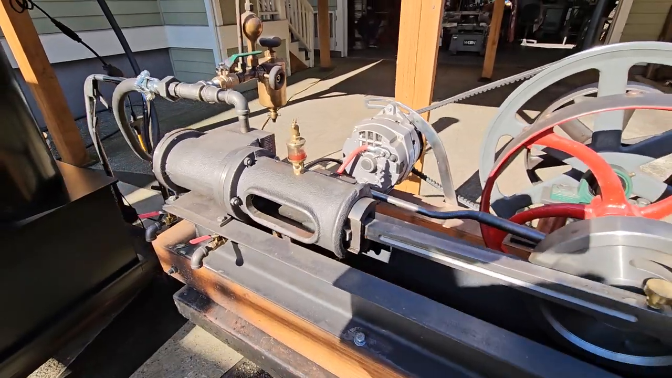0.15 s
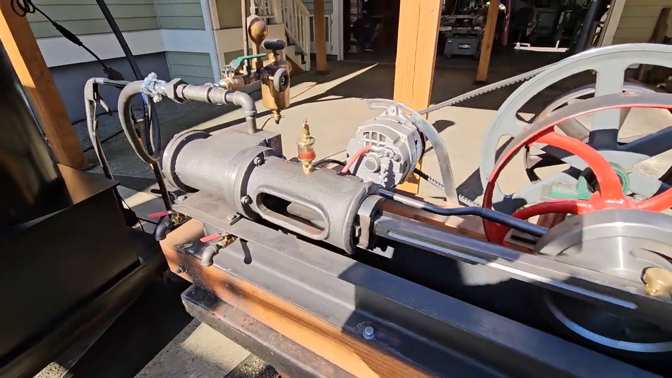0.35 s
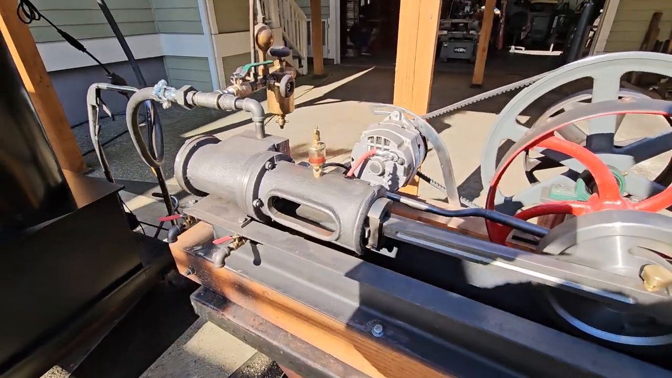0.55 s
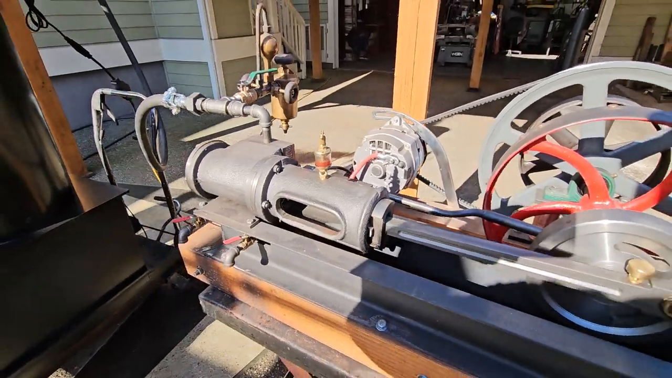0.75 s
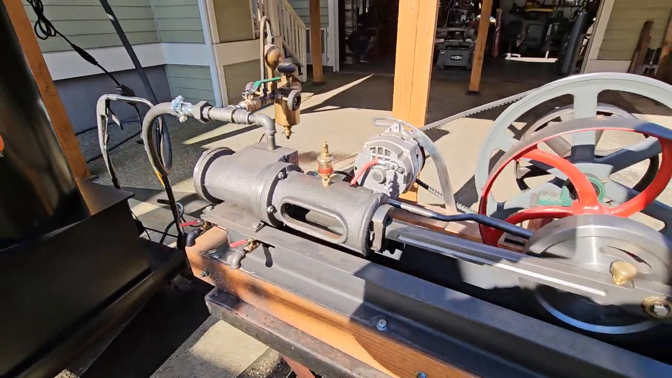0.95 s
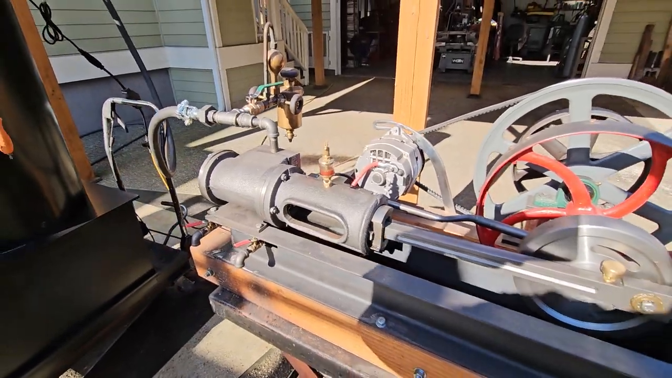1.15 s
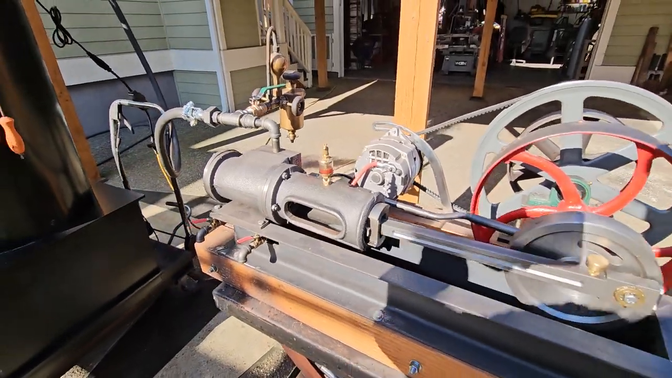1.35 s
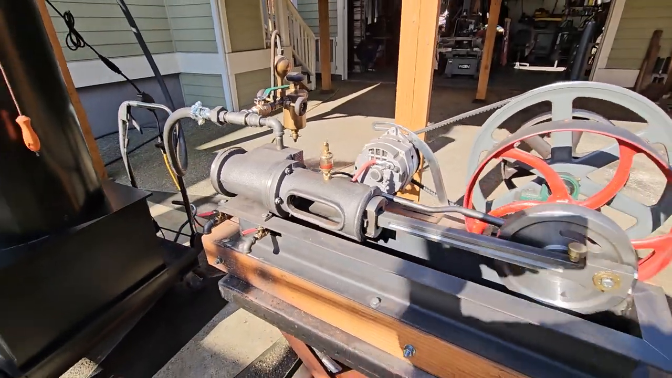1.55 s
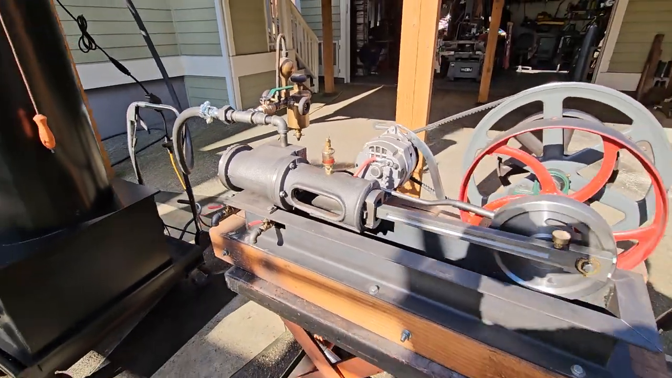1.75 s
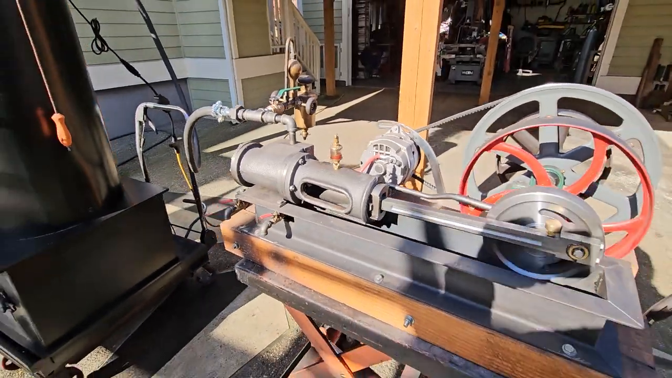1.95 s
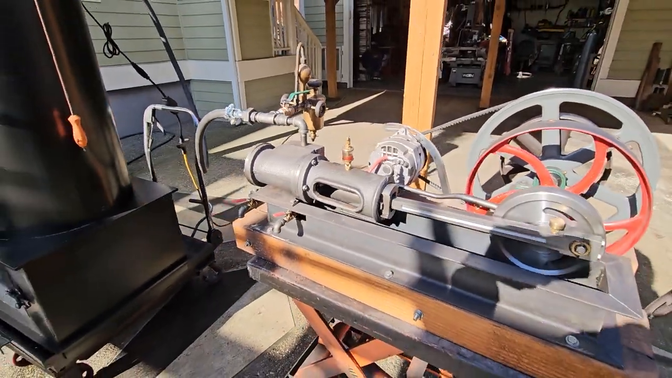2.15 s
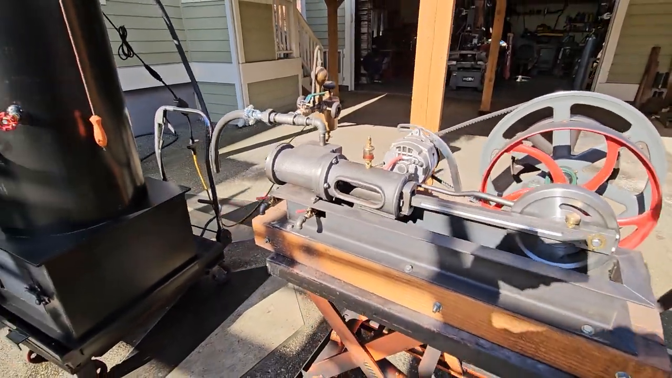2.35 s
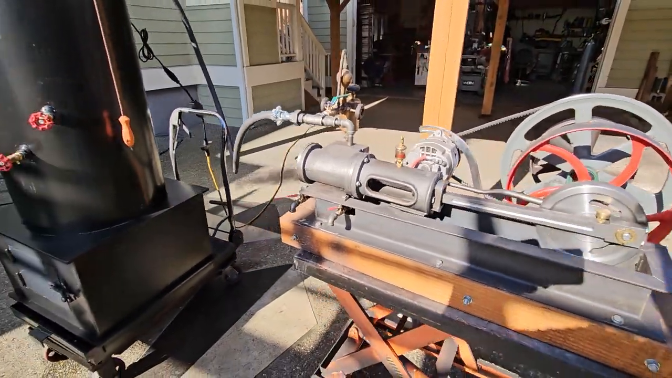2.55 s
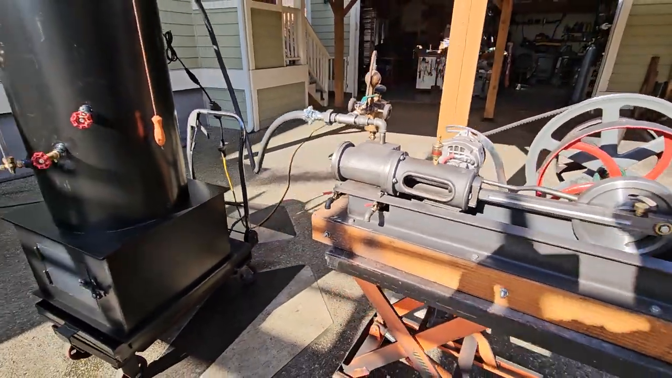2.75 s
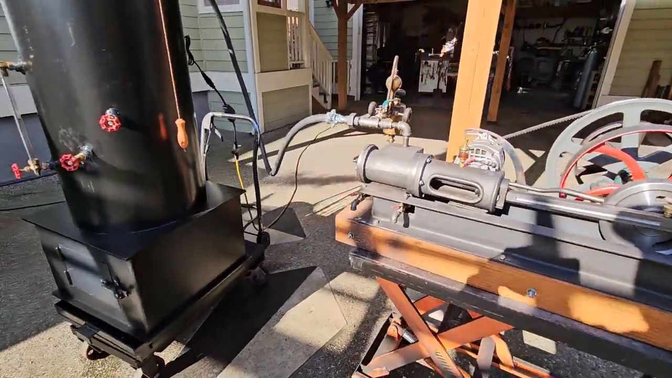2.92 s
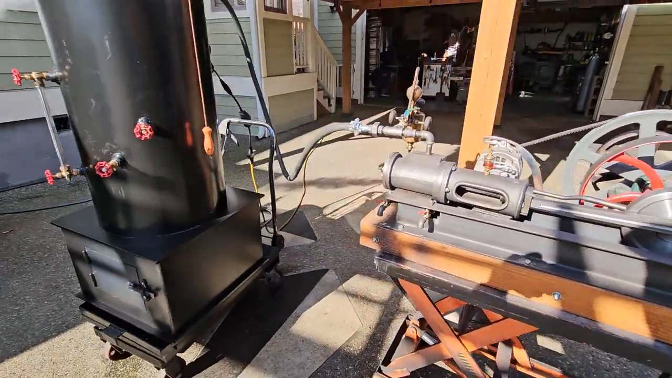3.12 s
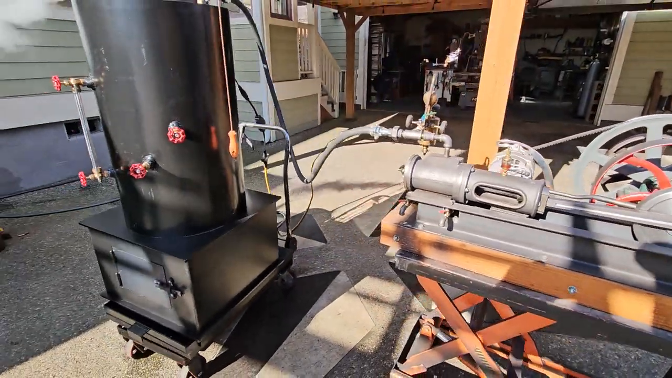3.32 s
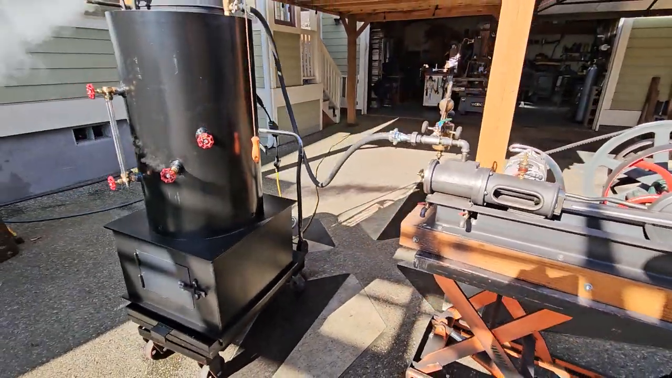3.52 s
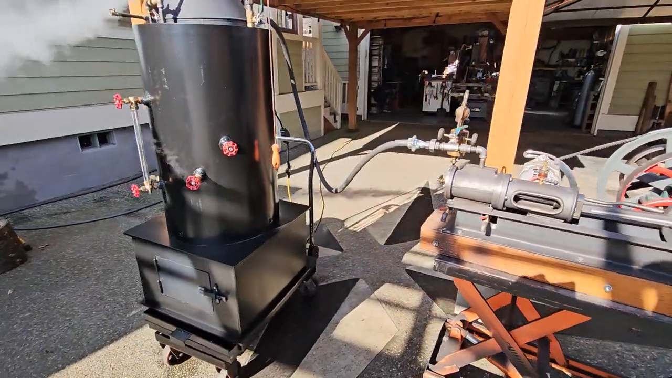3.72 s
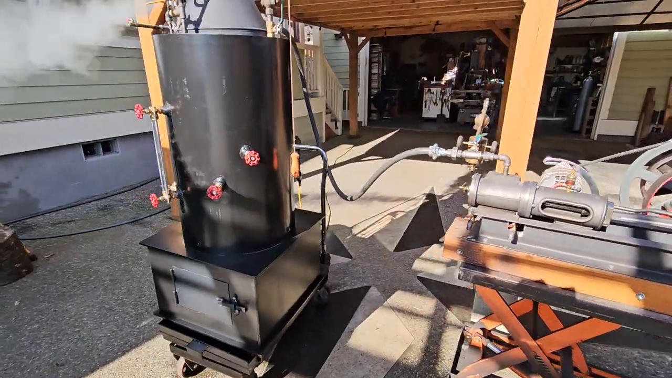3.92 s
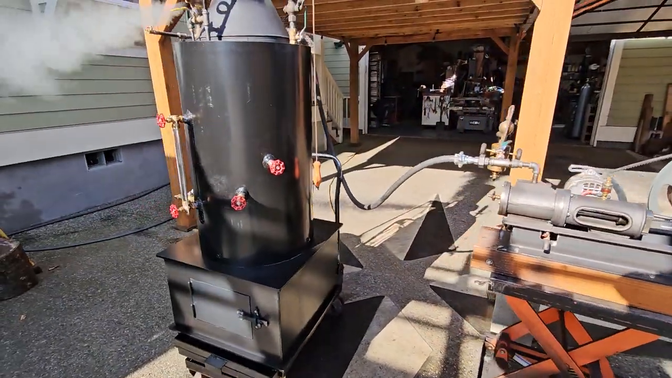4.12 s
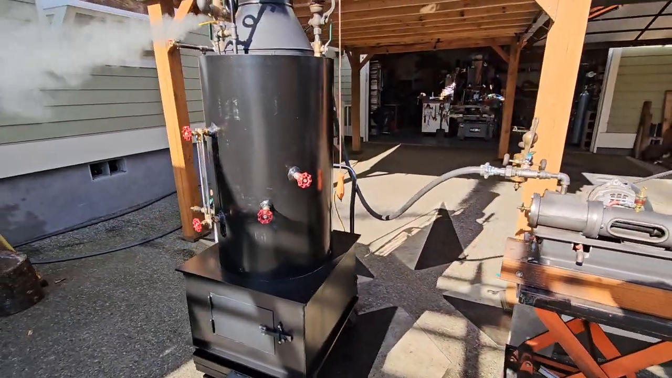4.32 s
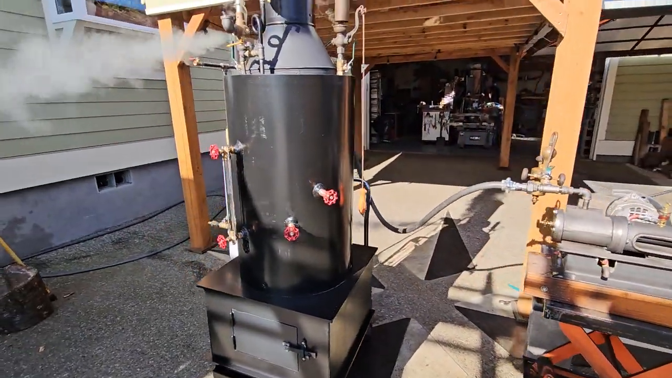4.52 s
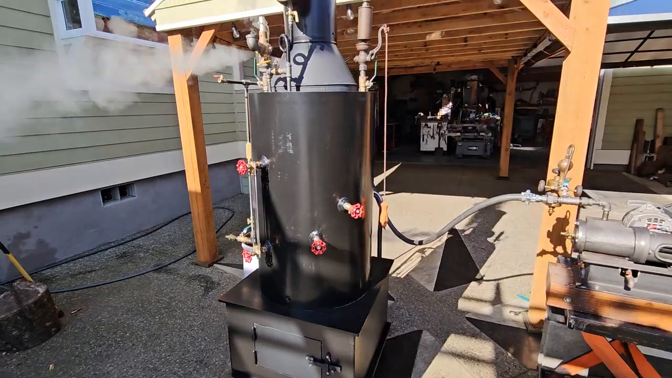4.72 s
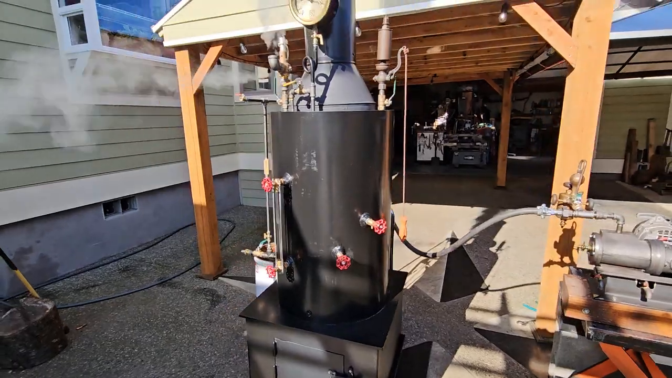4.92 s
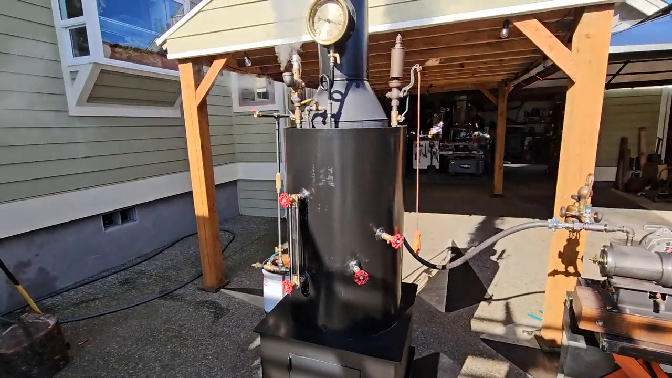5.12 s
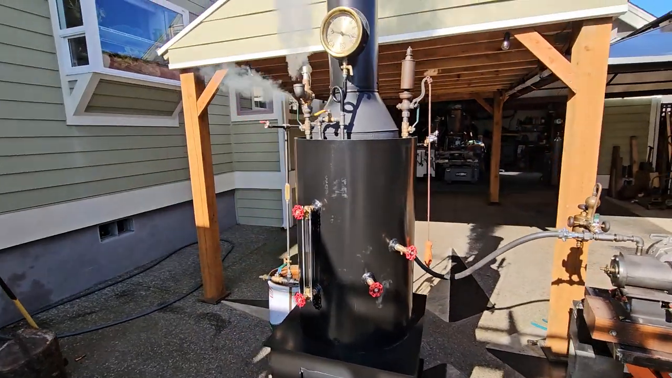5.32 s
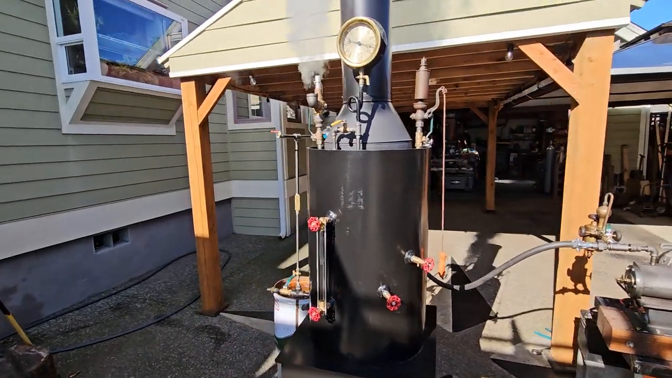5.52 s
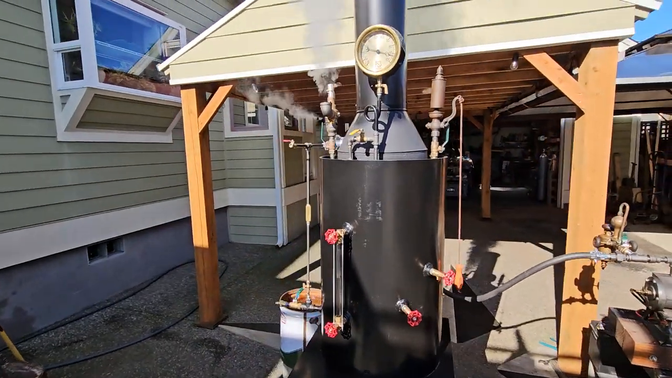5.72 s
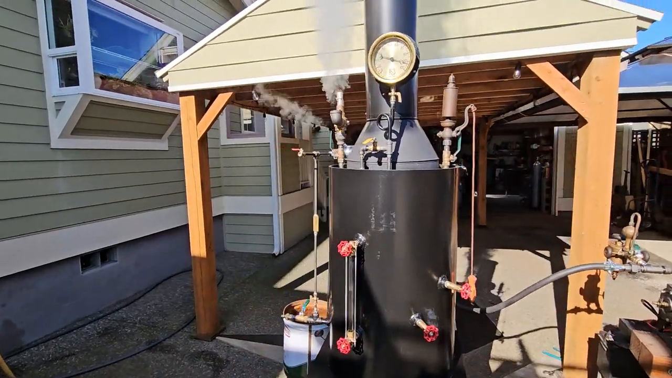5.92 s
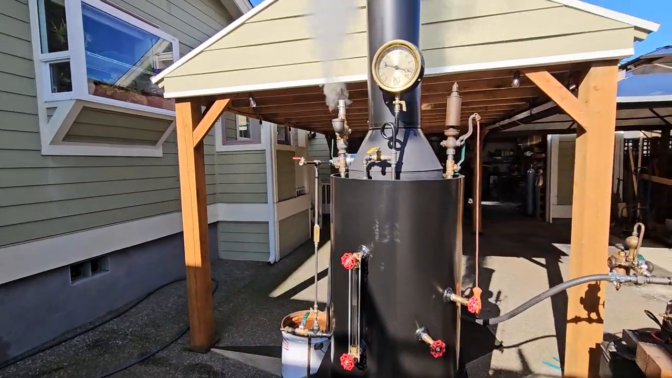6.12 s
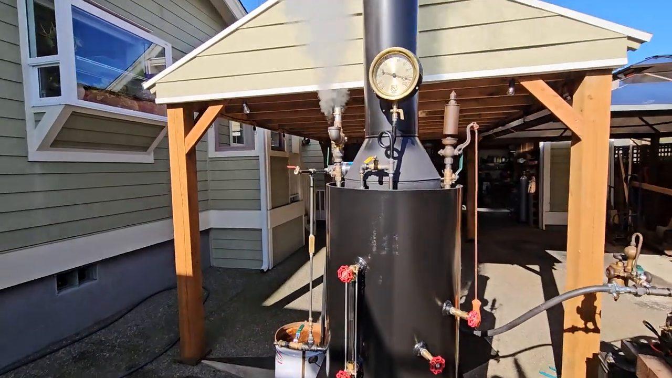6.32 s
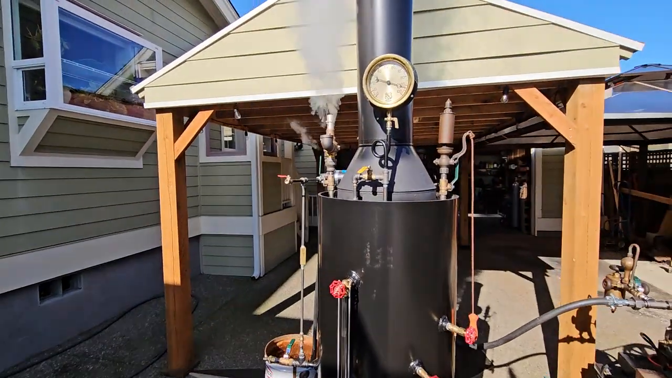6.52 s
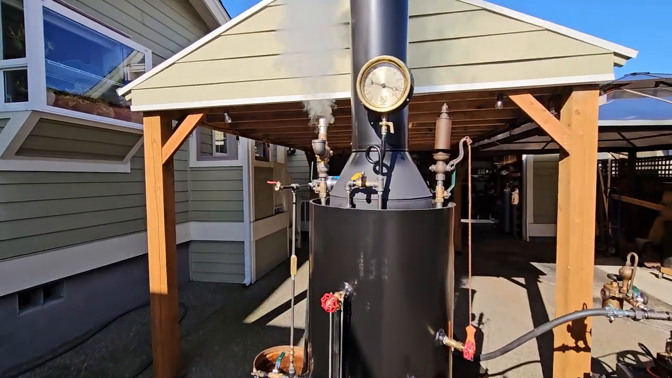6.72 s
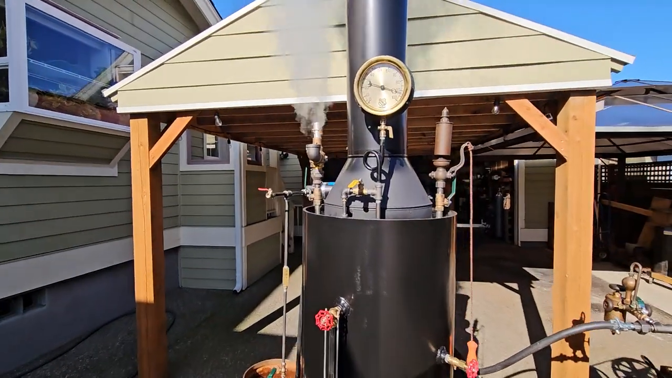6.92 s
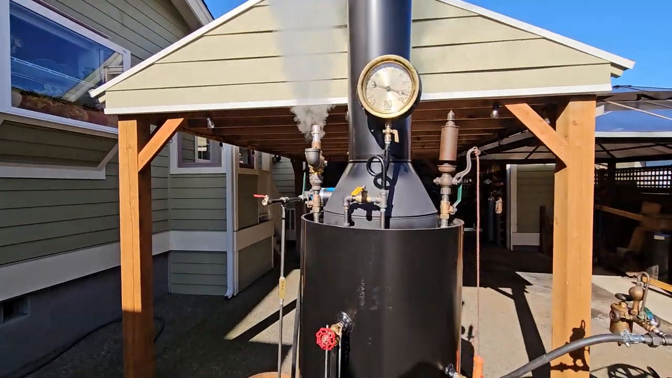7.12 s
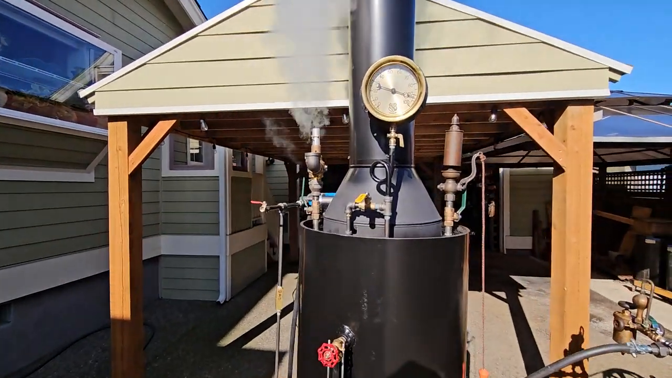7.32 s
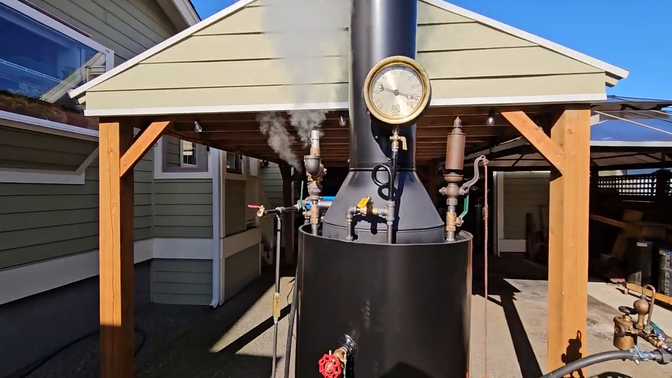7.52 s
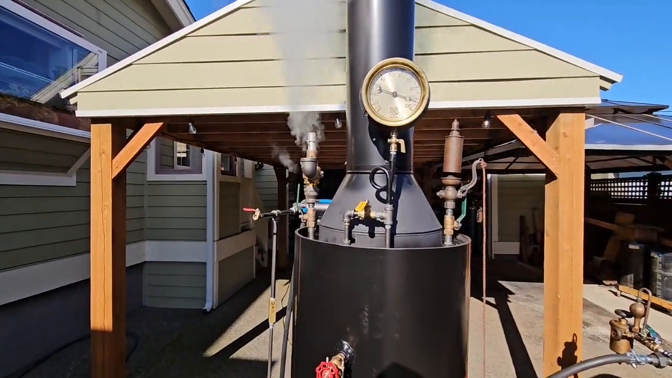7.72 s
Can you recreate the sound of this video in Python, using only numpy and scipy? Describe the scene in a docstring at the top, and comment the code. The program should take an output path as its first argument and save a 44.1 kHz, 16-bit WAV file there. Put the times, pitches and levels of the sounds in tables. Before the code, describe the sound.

For the first 0.4 seconds there is only a faint, low outdoor hum, like distant traffic and air. At about 0.42 seconds a boiler safety valve pops open: a short deep thump from the metal shell, a crisp wet spit, a tiny choke and a low boom swelling just behind it. The steam instantly becomes a loud, dense hiss, strongest until roughly 0.55 seconds, then settling. A faint, low moan slides downward around 0.75 to 0.93 seconds, nearly buried. The jet continues with slight flutter, a soft low roar and deep rumble, a little stronger near 3 seconds. As the handheld stereo microphone swings around, tone and width shift with hollow, drifting reflections. Between about 5.4 and 6.2 seconds, very high thin whistles chirp in irregular bursts. The bright hiss then carries on steadily to an abrupt end near 7.8 seconds.

```python
"""First a quiet yard hum is heard; then a steam boiler's safety valve pops open and vents a loud jet.
The jet is shaped noise: hiss, roar, deep rumble and a bright first spit. The pop is a set of dying sines
with a swelling boom. A brief low moan slides down soon after, and later the valve seat whistles in bursts.
A hand-held camera swings round from behind the boiler to face the valve, so the jet's colour, left-right
spread and bounces off the boiler, paving and posts keep changing."""
import sys
import numpy as np
from scipy import signal
from scipy.fft import rfft, irfft, next_fast_len
from scipy.io import wavfile
from scipy.ndimage import uniform_filter1d, map_coordinates

SR = 44100
rng = np.random.default_rng(int(sys.argv[2]) if len(sys.argv) > 2 else 0)


def wav_out(sig):
    """Save sig, one row per channel (or a flat mono array), as 16-bit PCM at SR to the path in sys.argv[1]."""
    wavfile.write(sys.argv[1], SR, np.round(np.clip(np.atleast_2d(sig).T, -1, 1) * 32767).astype(np.int16))


N = 342216
T = np.arange(N) / SR  # time of every sample [s]
FRAME = 2048  # length of one short-time spectrum [samples]

# Yard background, colour: (frequency [Hz], relative level per Hz [dB])
YARD_COLOUR = [(15, -44), (25, -9), (53, -4), (74, -5.5), (107, -8), (223, -16.5), (269, -13), (589, -27.5),
               (1150, -31), (1400, -30), (1600, -26), (1930, -31), (9520, -40.5), (12100, -39),
               (15900, -45)]
# Yard background, how alike the ports are: (frequency [Hz], likeness [0-1])
YARD_LIKENESS = [(100, 1), (500, 0.89), (1500, 0.23), (4000, 0.1)]
YARD_DB = -45  # level it settles to
YARD_EXTRA_DB, YARD_SINK_S = 3, 0.07  # it starts this much louder and sinks

# The low falling tone
MOAN_S, MOAN_LENGTH_S, MOAN_DB = .745, .19, -37.5
MOAN_START_HZ, MOAN_FALL_HZ_PER_S = 134, 205

# Bursts of the valve seat's edge tones, before the left-right tilt:
# (time of peak [s], tone [0 lower, 1 upper], level [dB], swell [dB/s], fade [dB/s])
WHISTLE_BURSTS = [(5.47, 0, -27, 300, 40), (5.55, 0, -23, 150, 60), (5.62, 0, -20, 80, 60),
                  (5.675, 0, -19.5, 60, 150), (5.74, 0, -23, 100, 300), (5.815, 0, -18.5, 400, 350),
                  (5.882, 0, -21, 400, 500), (5.937, 0, -17.5, 400, 450), (6.03, 0, -29, 150, 150),
                  (6.12, 0, -30, 100, 150), (6.19, 0, -31, 200, 300), (5.52, 1, -33, 150, 200),
                  (5.73, 1, -36, 300, 300), (5.78, 1, -33, 350, 400), (5.89, 1, -37, 150, 500),
                  (5.99, 1, -28, 250, 80), (6.07, 1, -29, 40, 500)]
LOWER_HZ, UPPER_HZ = 8404, 9565
SAG_S, SAG_HZ_PER_S = 5.72, 170  # from this time the lower tone sags

# Ringing of the boiler shell: (frequency [Hz], relative level [dB], time to fall 60 dB [s])
SHELL_MODES = [(85, 5, .1), (160, -1, .07), (310, 0, .03)]
POP_S, POP_RISE_S, POP_DB = .4227, .0013, -15.5
BOOM_S, BOOM_SWELL_S, BOOM_HZ, BOOM_DB = .4456, .027, 72.5, -17  # the roofed bay's answer

# Opening of the valve
LIFT_S, LIFT_RISE_S = .4248, .0042  # the valve lifts; its hiss is full this much later
REBOUND_S, REBOUND_WIDTH_S, REBOUND_DB = .4375, .0035, -8  # the disc falls back once and chokes the jet
RUSH_DB, RUSH_HOLD_S, RUSH_FALL_S = 3, 0.072, 0.044  # the first rush stands over the steady jet, then settles

# Strength of the jet, before the opening, wobbles and left-right tilt:
# (time [s], hiss level [dB], roar level [dB], deep rumble level [dB])
JET_LEVELS = [(.6, -14, -33.5, -50), (1.4, -15, -36, -61), (1.8, -14, -38, -59), (2.2, -13, -34.5, -56),
              (3.3, -12, -31.5, -47), (4.4, -11.5, -35.5, -51), (5, -12, -36, -46), (5.35, -14, -39.5, -50),
              (5.7, -14, -43.5, -54), (6.6, -13, -43.5, -46), (7.1, -12.5, -40.5, -46),
              (7.76, -13, -40, -43)]
# Colour of the roar: (frequency [Hz], relative level per Hz [dB])
ROAR_COLOUR = [(55, -24), (90, -2), (180, 4.5), (250, -1), (320, -5), (400, -10), (520, -19.5)]
# Colour of the deep rumble: (frequency [Hz], relative level per Hz [dB])
RUMBLE_COLOUR = [(25, -28), (42, -4), (55, 0), (70, -3), (95, -36)]
# Colour of the first wet spit: (frequency [Hz], relative level per Hz [dB])
SPIT_COLOUR = [(900, -18), (2500, -11), (3300, 7.5), (4000, 1), (5000, 0.5), (6000, -10), (8600, 0),
               (9300, -8), (9800, -25), (10800, -12), (12500, 0), (13800, -9), (15500, -5)]
# Colour of the hiss at the left microphone port: (frequency [Hz], relative level per Hz [dB])
LEFT_COLOUR = [(400, -4.5), (750, 1.6), (1200, -1.5), (1700, -1), (2200, 4), (2800, -4.3), (3500, -1.5),
               (4100, -4), (5300, -2), (5900, -4), (7400, -2.2), (9150, -6), (9500, -8.5), (10000, -9.5),
               (11300, -6.5), (11900, -3.5), (13600, -4), (14600, -1), (15600, -4)]
# Colour of the hiss at the right microphone port: (frequency [Hz], relative level per Hz [dB])
RIGHT_COLOUR = [(400, -4.5), (750, 2.5), (1250, -1), (1500, 0), (1750, 4), (2200, 2.5), (2600, -1),
                (2800, -0.4), (3400, 1), (3900, -3), (4700, 0.7), (5900, -6.5), (7500, -3), (9100, -2.5),
                (9500, -9.5), (11200, -6.7), (11900, 2.1), (13200, -3), (15600, 0)]

# Swing of the camera: (time [s], view [0-6, in the order of VIEW_SHADES])
CAMERA_SWING = [(1.2, 0), (2.4, 1), (2.95, 1.25), (3.2, 1.9), (4.1, 2.1), (4.6, 3), (5, 3.1), (5.35, 4),
                (5.55, 4.2), (5.9, 5), (6.4, 5.1), (7, 5.5), (7.6, 6)]
# Paths of the jet to the ports: (view [0-6], lag of the left port [ms],
# bounce off the boiler [gain], bounce off the paving [gain])
VIEW_PATHS = [(0, .2, .2, .1), (1, .11, .22, .08), (2, .02, .15, .05), (3, -.06, .22, .05),
              (4, -.125, .2, .05), (5, -.155, .26, .12), (6, -.145, .26, .05)]
# Shading by boiler and camera body, one table for each view: (frequency [Hz], left level [dB],
# right level [dB], left-right likeness [0-1], lead of the left port [rad, less below 1 kHz])
SHADE_BEHIND = [(350, 3, 2.5, 0.86, 0.0), (460, 1, 1, .88, 0), (570, -2, -2, .85, 0),
                (880, -1, -1, 0.75, 0.1), (1050, -4, -3.5, .75, 0), (1350, -2, 1.5, 0.8, -0.5),
                (2100, -2, 1, 0.47, 1.1), (2920, 1.5, 0.1, 0.13, 0.5), (4300, -1.5, 3, 0.5, -1),
                (5300, 1, 2, 0.24, -1.5), (6100, 1, 4, 0, 2), (7300, 0.7, 1.1, 0.45, -1.5),
                (9000, 4, 2, 0.4, 0.5), (10500, 0.5, 3.5, 0.05, -3), (11500, -1, 0, 0.22, 1),
                (12700, 5.5, -0.5, 0.3, 8), (14000, -3, 0, 0.08, 7), (15600, -1, -7, 0, 1)]
# Shading while turning, same columns: (frequency [Hz], left [dB], right [dB], likeness [0-1], lead [rad])
SHADE_TURNING = [(350, 3, 3.5, 0.93, -0.5), (920, -1.2, -1.5, 0.68, 0), (1310, 1.5, 4.5, 0.33, -0.5),
                 (2100, -1, 3.5, 0.64, 0.2), (2950, 1.5, 0, 0.32, 1.0), (4200, 0.5, -1, 0.22, -1.3),
                 (5400, 1.2, 3, 0.27, 1), (6200, -0.5, 2, 0.34, -0.5), (7400, 0, 0, 0.17, 4.5),
                 (9000, 2.5, 0, 0.11, 13), (10400, 1, -1, 0.21, 4.2), (11600, 1, 0.5, 0.17, 7.5),
                 (12700, 3.5, -0.5, 0.26, 12), (14000, -2.4, -1.3, 0.04, 9.9),
                 (15500, -2.5, -5.6, 0.1, 9.9)]
# Shading beside the boiler: (frequency [Hz], left [dB], right [dB], likeness [0-1], lead [rad])
SHADE_BESIDE = [(354, 3.5, 3, 1, -0.5), (470, 5, 4.5, .95, 0), (570, 1, 1, .9, .2),
                (905, -0.8, -1.4, 0.76, 0.45), (1460, -2.3, 1.8, 0.33, -1.5), (2170, 2.5, 5.2, 0.76, 0.5),
                (2950, 3, -1.5, 0.49, 1), (4200, -0.5, -2.5, 0.2, 0.5), (5530, -2, -1.5, 0.49, 4.5),
                (6200, -4, -1.5, 0.07, 5.5), (7450, -2.5, -0.2, 0.35, 8.8), (8900, 0, -0.8, 0.12, 12.8),
                (9700, 0, -2, .1, 15), (10300, 1, -1, 0.18, 16.5), (10800, -2, -2.5, .25, 16),
                (11600, -4, 0, 0.31, 14.5), (12600, 8, 1.5, 0.46, 21.5), (14000, -4, 2, 0.24, 17.9),
                (15800, -1, -4.5, 0.34, 19.9)]
# Shading while passing: (frequency [Hz], left [dB], right [dB], likeness [0-1], lead [rad])
SHADE_PASSING = [(350, .6, 0, 0.98, -0.5), (470, 5, 5, 0.94, -1), (570, 1, -0.5, 0.78, .2),
                 (890, 0, -1.5, 0.86, -1), (1350, 1.5, 1.5, 0.35, 0), (2070, -1.5, 4, 0.84, 0.54),
                 (2980, 2, -1, .3, 1), (4200, -1.5, -2.5, .2, 3), (5300, 2, 1.4, .82, 3.5),
                 (6240, -2.5, -2, .44, 4.5), (7400, 0, 0, .1, 7), (9000, 1, 0.5, .35, 14),
                 (10500, 5, 4, 0.39, 13), (11500, 3, -2, .1, 17), (12700, 2, -0.5, .1, 11),
                 (14000, 0, 1, .26, 11), (15400, -1, -3.5, .39, 14)]
# Shading when nearly facing the valve: (frequency [Hz], left [dB], right [dB], likeness [0-1], lead [rad])
SHADE_NEARLY = [(350, 0, -1, 0.93, -0.5), (470, 3, 2.5, 0.98, -1), (600, 0.5, -2, 0.95, 0.5),
                (900, 1.5, -1, 0.87, -0.4), (1340, -1, 0.5, 0.46, -3), (2100, -4.5, 1, 0.57, 0.2),
                (2950, 1, 0, 0.59, 0.7), (4220, 0.5, -2.5, 0.28, -0.5), (5430, -1.5, -4.5, 0.19, 9),
                (6200, -1.5, 1.0, 0.53, 4), (7400, -1, -3, 0.14, 6.5), (9000, 4.7, 2, 0.24, 5),
                (10400, -3, 0, 0.45, 5), (11600, -4, 0, 0.46, 10), (12700, 0, -6.0, 0.25, 9.8),
                (14000, 0.2, 0, 0.26, 11.4), (15500, 0, 4, 0.51, 15)]
# Shading when facing the valve: (frequency [Hz], left [dB], right [dB], likeness [0-1], lead [rad])
SHADE_FACING = [(348, 0.5, -1.5, .97, -0.5), (460, 0, 0, 0.89, -.4), (617, 0, -2.5, 1, 0.2),
                (880, 0.2, -0.5, 0.92, -0.4), (1340, -2, -4, 0.5, -0.5), (1540, -3, 1, .55, -1.5),
                (1870, -5, 1, .6, 0.5), (2080, -1.5, 4.5, 0.6, 1), (2570, 5, 6, 0.83, 0),
                (2900, 1, -1, 1, 0), (3300, 4, 0.8, 0.74, -0.5), (4300, -2, -0.5, 0.46, 0.5),
                (5450, 8, 2, .25, 6), (6240, 0, 0, .35, 3.5), (6800, -1, -4, .5, 2), (7100, 2, 0.5, .4, 6),
                (8800, 2, -2.5, .1, 6.5), (10300, 1, -4, .2, 7), (10900, -5, 3, .5, 8),
                (11800, 6, 5, 1, 5.5), (12700, -1, -14, .25, 13), (13500, 0, 2, .5, 11),
                (14500, -1, 4, .5, 13.5), (15400, 0.5, 3, .63, 9.5)]
# Shading with the camera raised: (frequency [Hz], left [dB], right [dB], likeness [0-1], lead [rad])
SHADE_RAISED = [(350, -0.5, -1, 0.99, -1), (890, 0.8, -1.7, 0.86, -0.5), (1080, 1, -.5, .8, -.7),
                (1370, -5, -4.5, 0.55, -2), (1800, -2.5, 2, .6, -.8), (2200, 2.5, 9, 0.73, 0.2),
                (2500, 2.5, 3, .7, .3), (3020, 5, -0.5, 0.63, 0.4), (4170, -2, 1.7, 0.48, -0.5),
                (5600, 9, 1.5, 0.45, 3.5), (6270, -2, 2, 0.49, 4), (7300, 5.5, -0.5, 0.73, 5),
                (9000, -2.8, -3.5, 0.36, 11), (11000, -0.5, 1.5, 0.54, 12.9), (12100, -1, -5, 0.24, 18),
                (12600, 0, -2, 0.6, 17), (13500, -.5, -3, .4, 16), (14000, -1.4, 4, 0.57, 16.5),
                (15200, 0.5, 3.5, 0.66, 17.2)]
VIEW_SHADES = [SHADE_BEHIND, SHADE_TURNING, SHADE_BESIDE, SHADE_PASSING,
               SHADE_NEARLY, SHADE_FACING, SHADE_RAISED]

# Bounce off the boiler as the camera moves: (time [s], delay at left port [ms], delay at right port [ms])
BOILER_DELAYS = [(.8, 1.15, 1.68), (2.1, 1.8, 1.87), (3.2, 1.91, 1.83), (4, 2.06, 2.11), (5.2, 2.76, 2.63),
                 (6, 2.45, 2.53), (7.7, 2.84, 2.62)]
PAVING_MS, PAVING_MS_PER_S = 5.4, 0.218  # delay of the paving bounce at time 0, and its growth
SCATTER_GAIN = 0.14  # strength of each of many far bounces
SCATTER_FOLLOWS = 1.2  # average growth of their delays against the boiler bounce's
SCATTER_FULL_HZ = 1500  # longer waves pass round the posts
# Two bands of the hiss that slide as the camera moves, raised or lowered:
# (time [s], wide band [Hz], its level [dB], narrow gap [Hz], its level [dB])
SLIDING_BANDS = [(.6, 710, 1.5, 1190, -2), (1.6, 660, 3, 1150, -5), (2.1, 656, -0.5, 1030, -7),
                 (2.9, 624, 3.5, 960, -3), (3.4, 624, -1.5, 1140, 6), (4.3, 634, 2, 1120, -1),
                 (4.9, 656, 6, 1010, -3), (5.5, 750, 0.5, 1010, -6), (6, 780, 3, 960, -3),
                 (6.9, 770, 2, 936, -10), (7.7, 760, 0, 940, -10)]
BAND_WIDTH_HZ, GAP_WIDTH_HZ = 72, 26

TOP_HZ = 15830  # nothing is kept above this


def amp(db):
    """Turns decibels into gain."""
    return 10 ** (np.asarray(db) / 20)


def unit(x):
    """Scales a signal to an average strength (rms) of 1."""
    return x / np.sqrt(np.mean(np.abs(x) ** 2) + 1e-20)


def along(points, hz):
    """Reads each column after the frequency, on a log frequency axis."""
    f, *columns = np.transpose(points)
    return np.array([np.interp(np.log(hz + 1), np.log(f + 1), c) for c in columns])


def curves(rows, t=T):
    """Reads each column after the first, at t."""
    s, *columns = np.transpose(rows)
    return [np.interp(t, s, c) for c in columns]


def wobble(rate):
    """A smooth random curve with `rate` random points a second."""
    points = rng.standard_normal(int(N * rate / SR) + 4)
    return map_coordinates(points, [np.arange(N) * rate / SR])


def eddies(patchy_db):
    """Two unrelated noises as short-time spectra, sharing patches of random gain like swirls in a flow."""
    hz, t, z = signal.stft(rng.standard_normal((2, N)), SR, nperseg=FRAME)
    patches = uniform_filter1d(rng.standard_normal(z.shape[1:]), size=20, axis=0)  # across frequency
    patches = uniform_filter1d(patches, size=4, axis=1)  # across time
    return hz[:, None], t, z * amp(patchy_db * unit(patches))


def at_ports(z, likeness, gains):
    """The left port hears a share of what the right one hears, the rest is its own; joint rms 1."""
    own = np.sqrt(1 - np.clip(np.abs(likeness), 0, 1) ** 2)
    left = likeness * z[0] + own * z[1]
    right = z[0]
    pair = gains * np.array([left, right])
    return unit(signal.istft(pair, SR, nperseg=FRAME)[1][:, :N])


def rush(colour, alike, patchy_db):
    """Stereo noise of a fixed colour, with random patches of gain."""
    hz, t, z = eddies(patchy_db)
    return at_ports(z, along(alike, hz)[0], amp(along(colour, hz)[0]))


def yard():
    """Distant traffic and air: shaped noise, most alike at the two ports in the bass."""
    level_db = YARD_DB + YARD_EXTRA_DB * np.exp(-T / YARD_SINK_S)
    return amp(level_db) * rush(YARD_COLOUR, YARD_LIKENESS, patchy_db=1.2)


def tone(hz, gain, waver_hz, flicker_db, apart):
    """An unsteady sine; echoes make level and phase wander apart at the two ports."""
    phase = 2 * np.pi * np.cumsum(hz + waver_hz * wobble(60)) / SR
    phase = phase + apart * np.outer([1, -1], wobble(14))
    flicker = flicker_db * (wobble(44) + apart * np.array([wobble(25), wobble(25)]))
    return gain * amp(flicker) * np.sqrt(2) * np.sin(phase)


def moan():
    """A brief low tone that slides down as it swells and fades."""
    u = np.clip((T - MOAN_S) / MOAN_LENGTH_S, 0, 1)  # 0 at its start, 1 at its end
    gain = amp(MOAN_DB) * np.sqrt(np.abs(np.sin(np.pi * u))) * (u < 1)
    hz = MOAN_START_HZ - MOAN_FALL_HZ_PER_S * MOAN_LENGTH_S * u
    return tone(hz, gain, waver_hz=1.5, flicker_db=2.0, apart=.1)


def whistles():
    """Both edge tones of the valve seat swell and fade in bursts, a little louder at the left port."""
    gain = np.zeros((2, N))
    for peak_s, which, db, swell, fade in WHISTLE_BURSTS:
        below_peak_db = np.where(T < peak_s, swell * (peak_s - T), fade * (T - peak_s))
        gain[which] = np.maximum(gain[which], amp(db - below_peak_db))  # the strongest burst wins
    lower_hz = LOWER_HZ - SAG_HZ_PER_S * np.clip(T - SAG_S, 0, None)
    lower = tone(lower_hz, gain[0], waver_hz=14, flicker_db=1.2, apart=.5)
    upper = tone(UPPER_HZ, gain[1], waver_hz=13, flicker_db=1.2, apart=.4)
    return amp([[1.1], [-1.1]]) * (lower + upper)


def pop():
    """The sudden pressure step thumps the boiler shell, which rings; a low boom swells after it."""
    t = np.clip(T - POP_S, 0, 1)
    ring = sum(amp(db - 60 * t / t60) * np.sin(2 * np.pi * hz * t) for hz, db, t60 in SHELL_MODES)
    attack = 1 - np.exp(-t / POP_RISE_S)
    u = np.clip(T - BOOM_S, 0, 1) / BOOM_SWELL_S
    swell = (u * np.exp(1 - u)) ** 2  # fullest at u = 1
    boom = swell * np.sin(2 * np.pi * BOOM_HZ * (T - BOOM_S))
    return amp(POP_DB) * ring * attack + amp(BOOM_DB) * boom


def lift():
    """Gain of the valve's opening: a fast rise, one rebound, a first rush."""
    since = T - LIFT_S
    rebound_db = REBOUND_DB * np.exp(-((T - REBOUND_S) / REBOUND_WIDTH_S) ** 2)
    rush_db = RUSH_DB * np.exp(-np.clip(since - RUSH_HOLD_S, 0, None) / RUSH_FALL_S)
    return np.clip(since / LIFT_RISE_S, 0, 1) ** 2 * amp(rebound_db + rush_db)


def sliding_bands(hz, t):
    """A wide band and a narrow gap that slide through the hiss, in dB."""
    band_hz, band_db, gap_hz, gap_db = curves(SLIDING_BANDS, t)
    band = band_db * np.exp(-((hz - band_hz) / BAND_WIDTH_HZ) ** 2)
    gap = gap_db * np.exp(-((hz - gap_hz) / GAP_WIDTH_HZ) ** 2)
    return band + gap


def late(hz, ms):
    """A delay, written as a turn of phase that grows with frequency."""
    return np.exp(-2j * np.pi * hz * ms / 1000)


def bounces(hz, t, boiler, paving):
    """Late, duller copies of the jet add to it and cancel it, cutting drifting combs into its spectrum."""
    boiler_ms = np.array(curves(BOILER_DELAYS, t))[:, None]
    shell = late(hz, boiler_ms) - 0.18 * late(hz, boiler_ms + 0.29)  # the shell's edge answers inverted
    ground = late(hz, PAVING_MS + PAVING_MS_PER_S * t)
    copies = boiler * shell + paving * ground
    scatter = SCATTER_GAIN * np.clip(hz / SCATTER_FULL_HZ, 0, 1) ** 2
    for start, pace, sign in rng.uniform(-1, 1, (24, 3)):  # posts, roof and walls
        far_ms = 9 + 7 * start + SCATTER_FOLLOWS * (1 + pace) * boiler_ms
        copies = copies + scatter * np.sign(sign) * late(hz, far_ms)
    return 1 + copies / (1 + (hz / 4500) ** 2)


def hiss():
    """The jet's turbulence as noise, coloured and delayed by where the camera points."""
    hz, t, z = eddies(patchy_db=0.81)
    view = np.clip(curves(CAMERA_SWING, t)[0], 0, len(VIEW_SHADES) - 1)
    lag_ms, boiler, paving = curves(VIEW_PATHS, view)
    shade_db, likeness = 0, 0
    for k, table in enumerate(VIEW_SHADES):
        share = np.clip(1 - np.abs(view - k), 0, 1)  # blends neighbouring views
        left_db, right_db, alike, lead = along(table, hz)
        shade_db = shade_db + share * np.array([left_db, right_db])
        turn = np.exp(1j * lead * np.clip(hz / 1000, 0, 1))  # long waves pass round the body
        likeness = likeness + share * alike * turn
    ports_db = np.array([along(LEFT_COLOUR, hz)[0], along(RIGHT_COLOUR, hz)[0]])
    low_cut = (hz / 300) ** 2 / (1 + (hz / 300) ** 2)
    gains = amp(ports_db + shade_db + sliding_bands(hz, t)) * low_cut
    gains = gains * bounces(hz, t, boiler, paving)
    return at_ports(z, likeness * late(hz, lag_ms), gains)  # longer path to the far port


def jet():
    """Hiss, roar and rumble of escaping steam; the first spit of water is brighter and dies fast."""
    hiss_db, roar_db, rumble_db = curves(JET_LEVELS)
    opening = np.clip((T - .422) / 0.0096, 0, 1) ** 2
    flutter_db = .35 * wobble(6) + .4 * wobble(20)
    roar_noise = rush(ROAR_COLOUR, [(80, 0.97), (300, 0.96)], patchy_db=1.5)
    roar = amp(roar_db + 0.45 * wobble(4.6)) * roar_noise
    rumble_noise = rush(RUMBLE_COLOUR, [(60, 0.96)], patchy_db=0.5)
    rumble = amp(rumble_db + 1.5 * wobble(4.3)) * rumble_noise
    spit_db = -15.5 - 60 * (T - .43) / .5 + 4.2 * wobble(149.2)  # falls 60 dB in half a second
    spit = amp(spit_db) * rush(SPIT_COLOUR, [(4000, 0.25)], patchy_db=5.0)
    low_part = opening * amp([[.3], [-.3]]) * (roar + rumble)  # slightly louder on the left
    return low_part + lift() * (spit + amp(hiss_db + flutter_db) * hiss())


def scene():
    """Yard, moan, whistling seat, boiler shell and jet, added together."""
    return yard() + moan() + whistles() + pop() + jet()


def record(dry):
    """The camera flattens peaks beyond 0.9, cuts deep bass and keeps nothing above its band limit."""
    m = next_fast_len(N + SR // 4)
    hz = np.fft.rfftfreq(m, 1 / SR)
    bass_cut = (1j * hz / (24 + 1j * hz)) ** 2
    top_cut = np.sin(np.pi / 2 * np.clip((TOP_HZ - hz) / 140, 0, 1)) ** 2
    spectrum = rfft(np.clip(dry, -.9, .9), m)
    return irfft(spectrum * bass_cut * top_cut, m)[:, :N]


dry = scene()
out = record(dry)
wav_out(out)
```